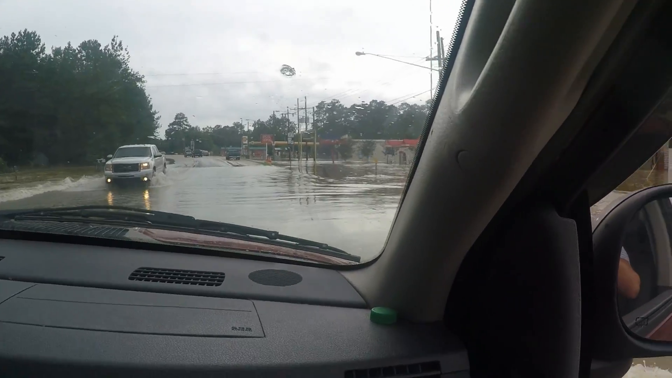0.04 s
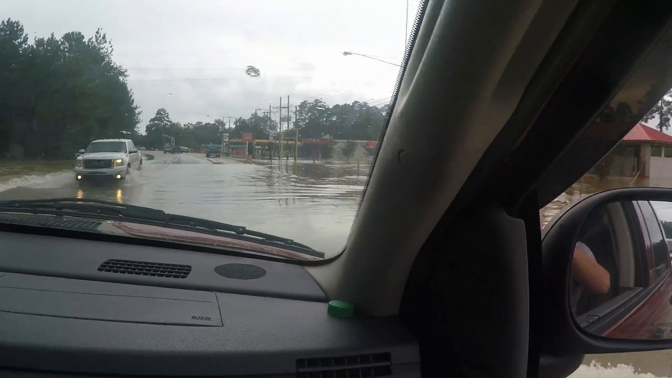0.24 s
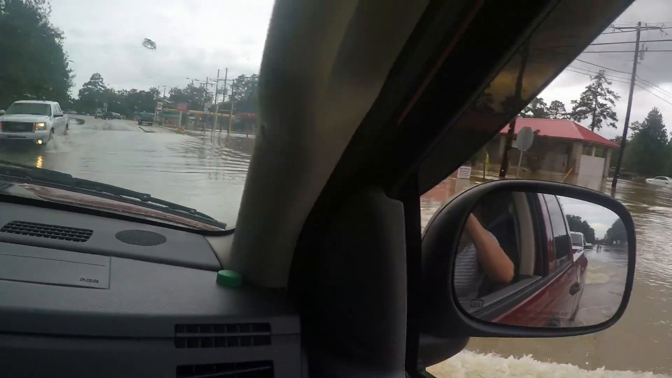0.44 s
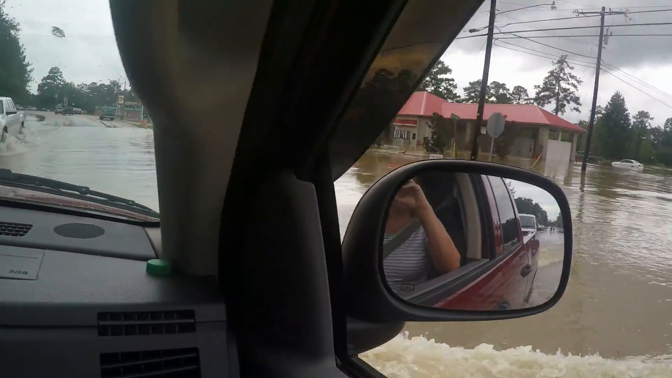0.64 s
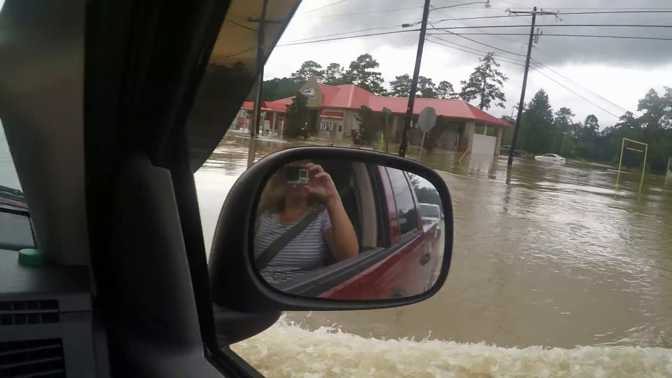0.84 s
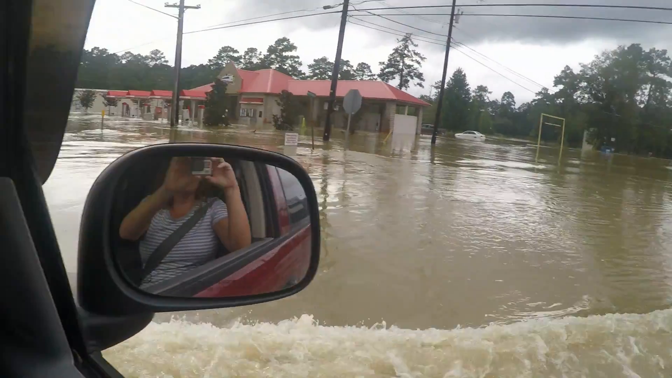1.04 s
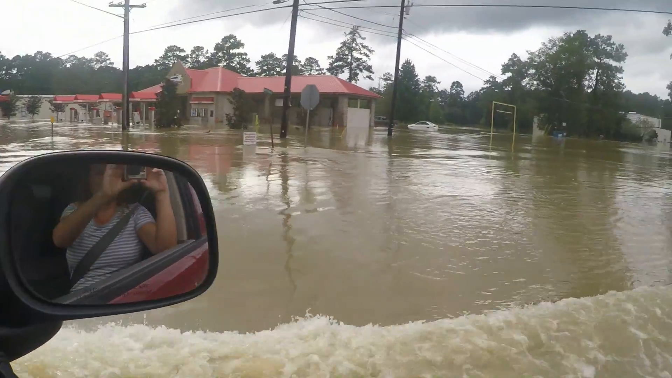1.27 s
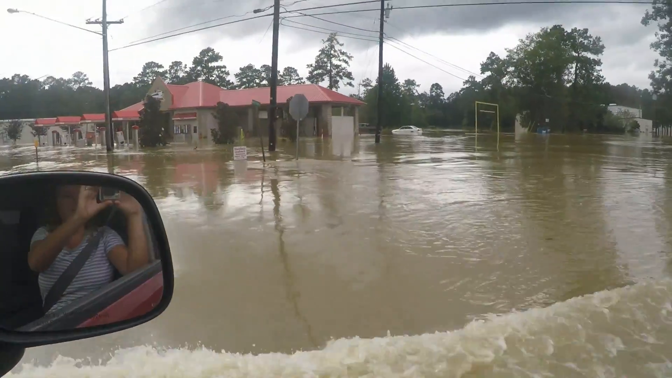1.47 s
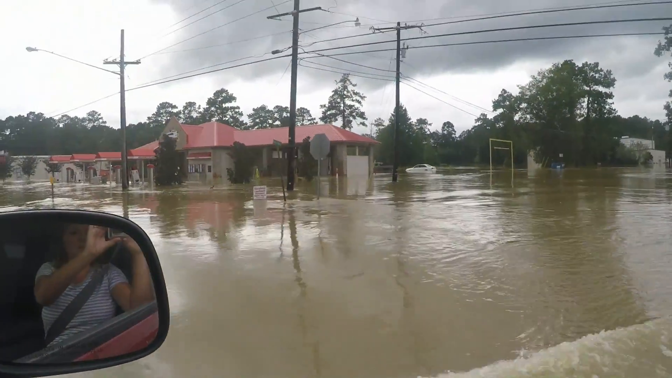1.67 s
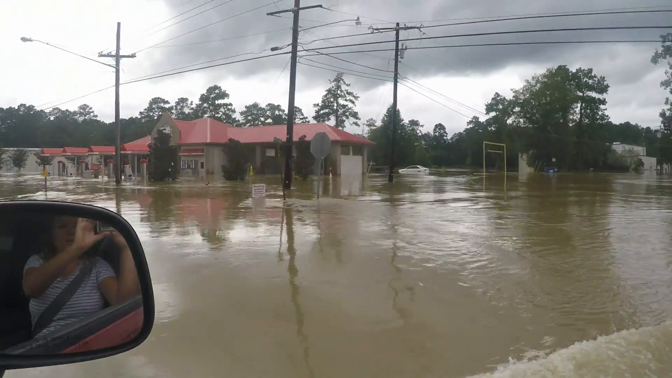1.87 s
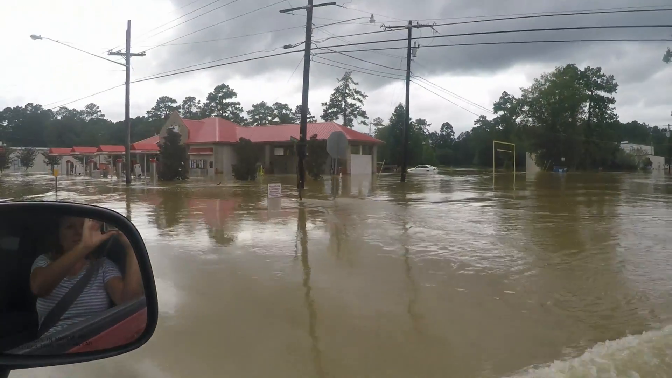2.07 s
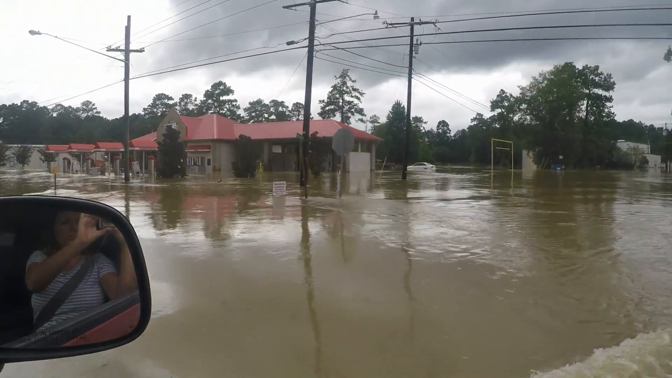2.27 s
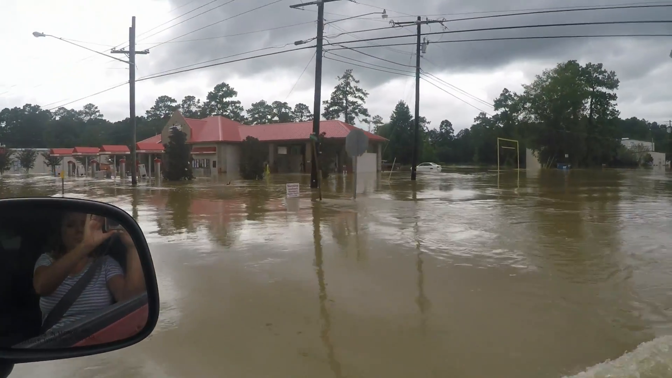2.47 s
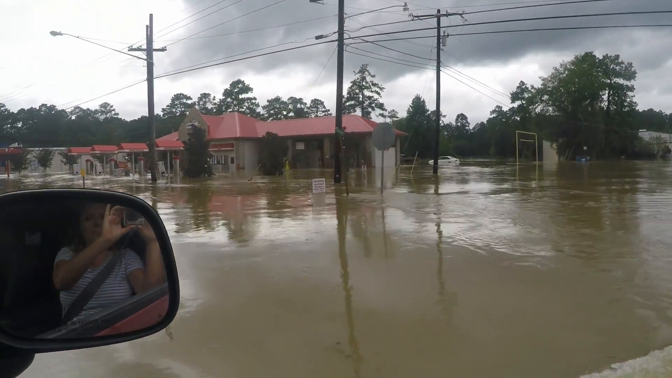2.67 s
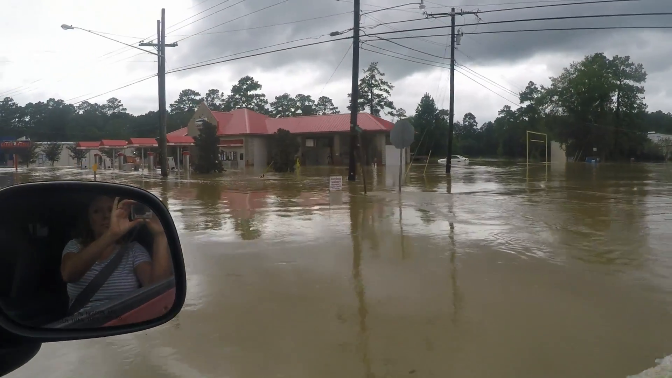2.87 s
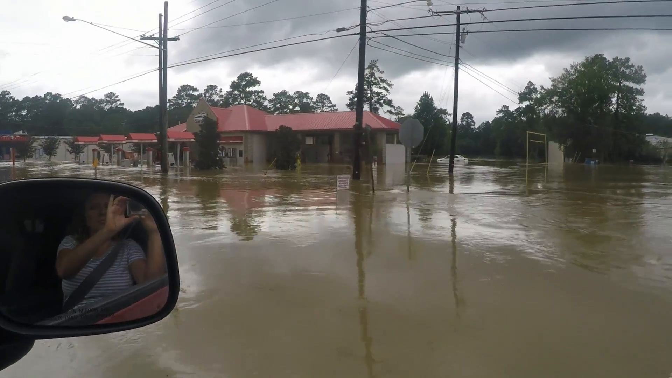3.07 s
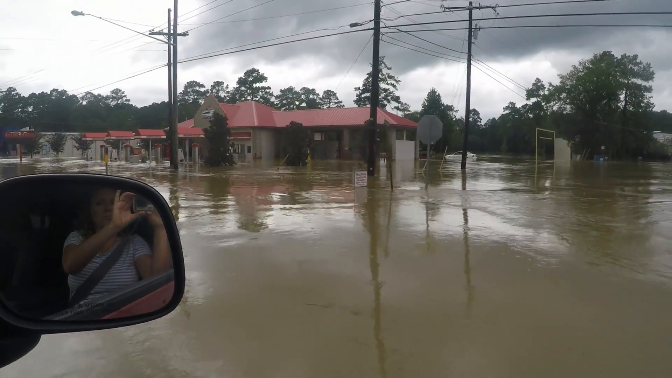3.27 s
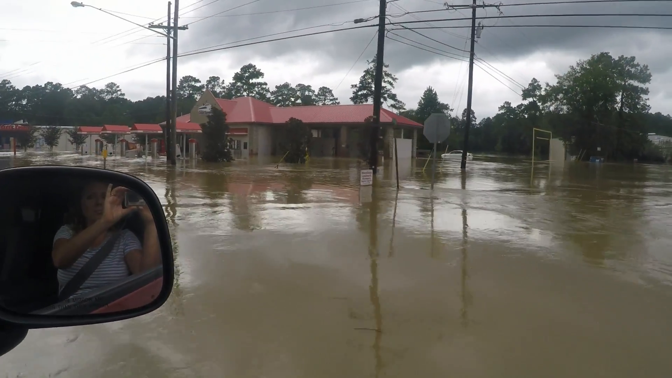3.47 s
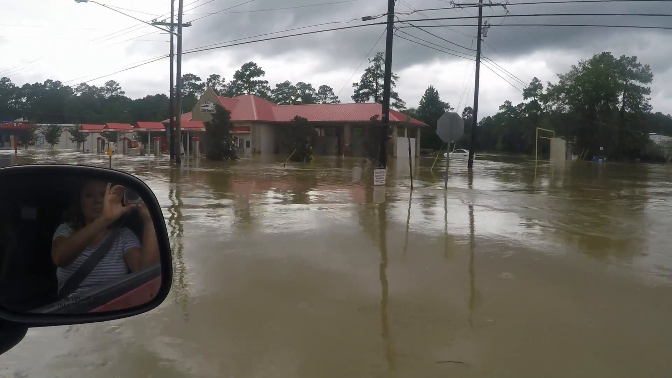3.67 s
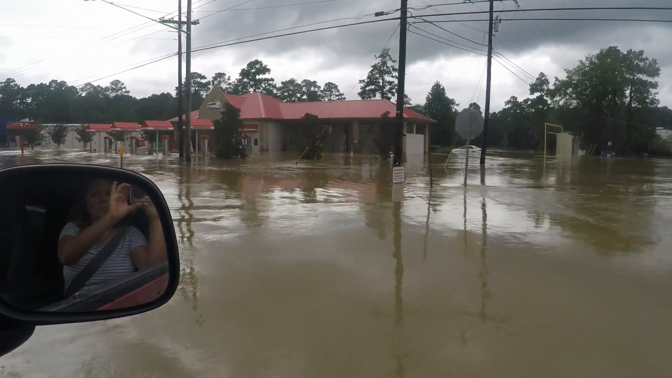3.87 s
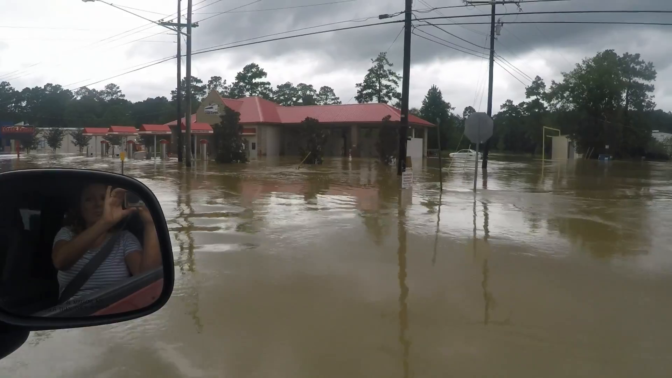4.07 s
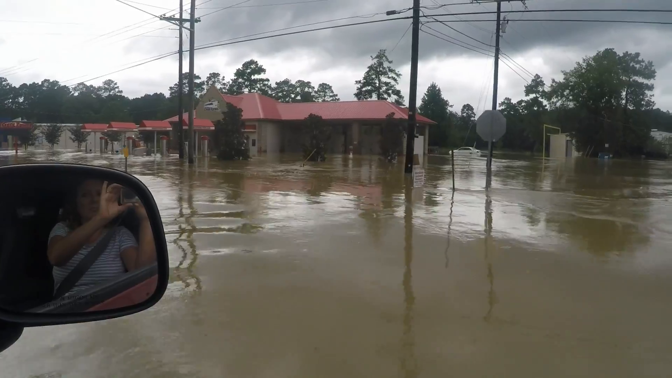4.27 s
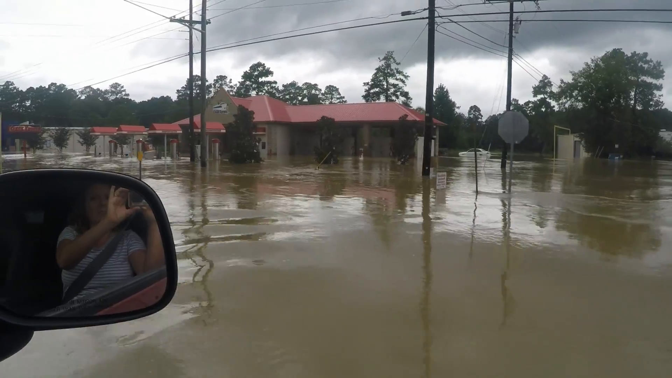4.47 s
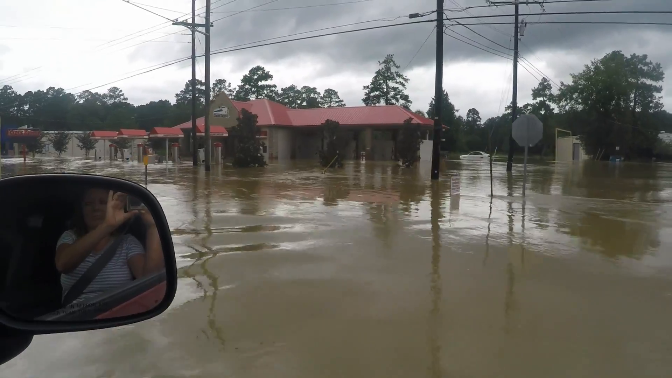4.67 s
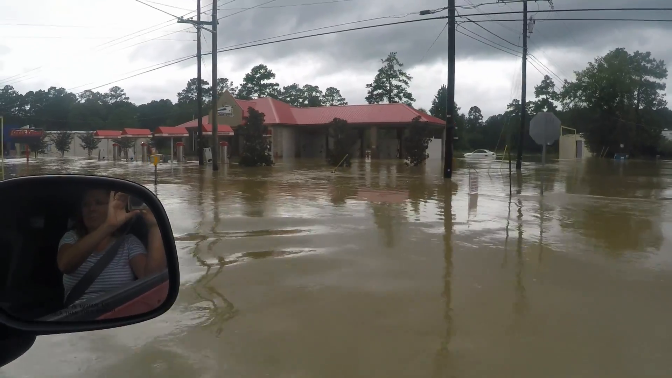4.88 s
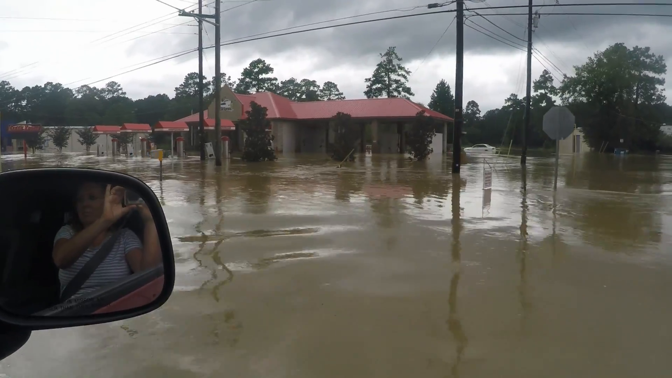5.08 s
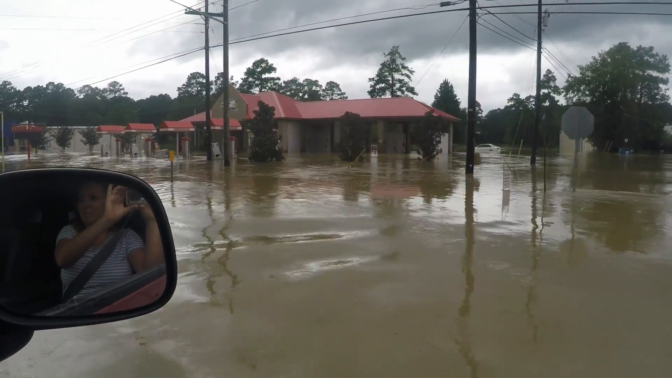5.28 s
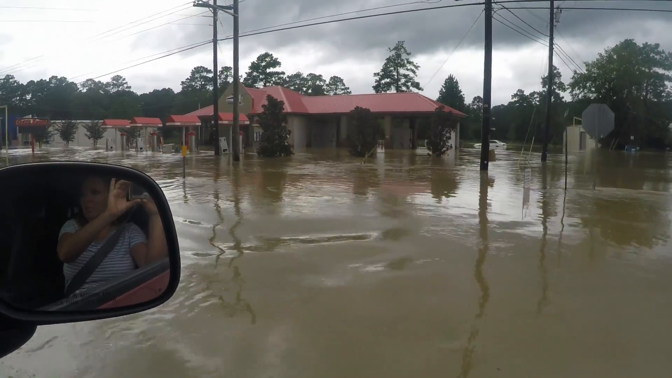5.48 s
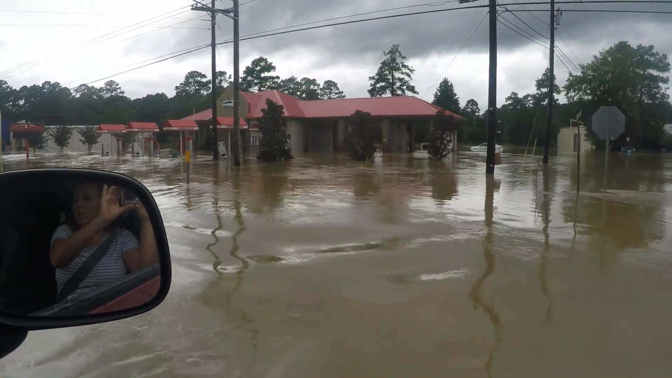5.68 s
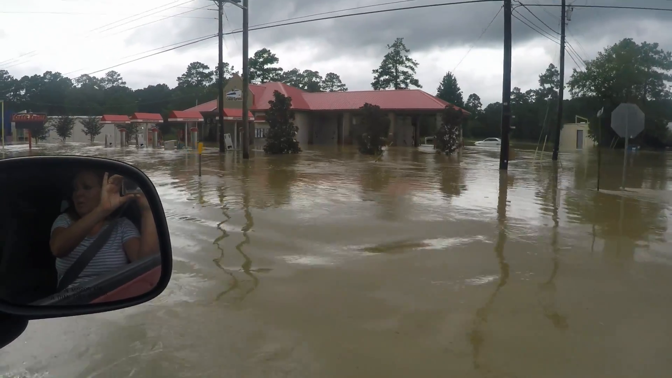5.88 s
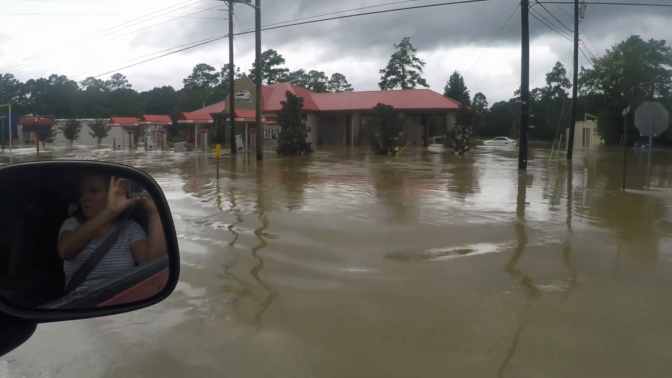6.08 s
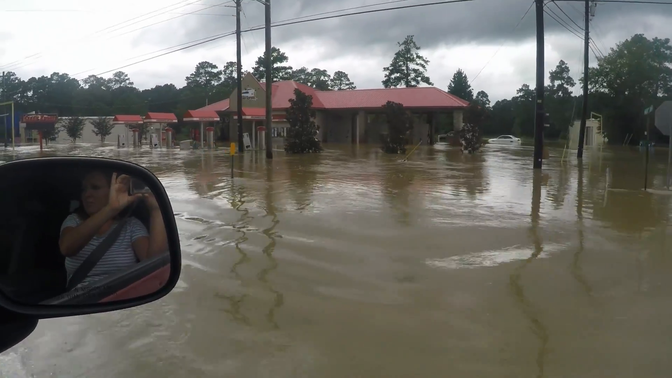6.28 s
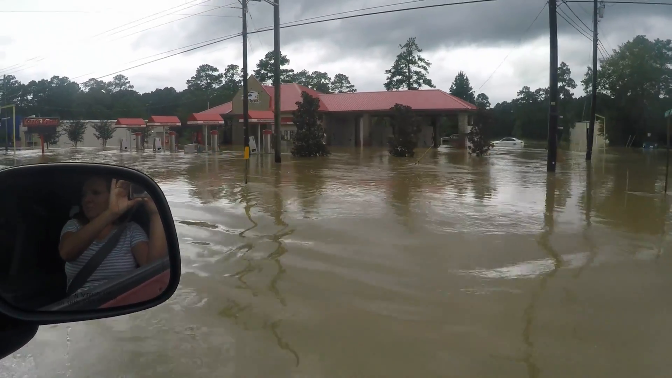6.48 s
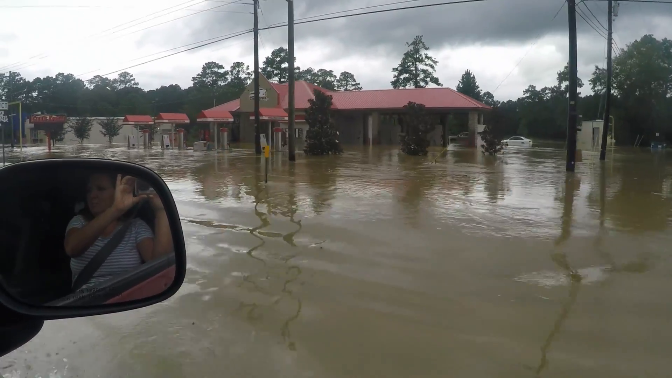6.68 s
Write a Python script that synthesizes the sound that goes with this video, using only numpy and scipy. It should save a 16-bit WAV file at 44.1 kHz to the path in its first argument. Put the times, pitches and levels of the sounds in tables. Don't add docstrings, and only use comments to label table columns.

```python
import sys
import numpy as np
from scipy import signal
from scipy.fft import rfft, irfft
from scipy.io import wavfile
from scipy.ndimage import uniform_filter1d

SR = 44100
rng = np.random.default_rng(int(sys.argv[2]) if len(sys.argv) > 2 else 0)


def put_to_file(sound):
    columns = np.atleast_2d(sound).T
    safe = np.clip(columns, -1, 1)
    whole_steps = np.round(safe * 32767)
    wavfile.write(sys.argv[1], SR, whole_steps.astype(np.int16))


def invert_db(level):
    return 10 ** (np.asarray(level, dtype=float) / 20)


N = 296686

# (time [s], rush level [dB])
WAVE_LEVEL = [(0, -41.5), (.24, -45), (.45, -46.5), (.75, -42.5), (1.0, -41), (1.2, -43), (1.5, -39),
              (2.2, -40), (3.5, -40), (5, -40), (6.73, -40)]
# (frequency [Hz], density [dB per Hz])
WAVE_SPECTRUM = [(60, -33), (150, -8.5), (400, -22), (900, -13.5), (1250, -15), (2100, -11.5), (3500, -10),
                 (4200, -15.5), (5300, -19.5), (8200, -27), (10500, -27.5), (12500, -35), (15500, -35.5)]
# (time [s], half length [s], lift [dB])
SPRAY_SLAPS = [(1.71, 0.027, -2.5), (1.972, .02, 1), (2.34, .02, 0.5), (2.592, .03, 3), (2.75, .02, 1),
               (3.056, 0.022, 2.5), (3.267, .02, 2.5), (3.4, 0.035, 2), (3.467, 0.039, 2.5), (3.69, .06, 1),
               (4.055, .03, 1.5), (4.323, 0.14, 1), (4.687, 0.034, 2.5), (4.97, 0.018, -0.5),
               (5.171, .03, 1.5), (5.295, .04, 1), (5.756, 0.036, 1), (6.0, .04, 1), (6.29, 0.025, 3),
               (6.408, 0.021, 4), (6.556, 0.028, 2.5), (6.663, 0.049, 2)]
# (frequency [Hz], width [Hz], lift [dB])
CASE_MODES = [(1392, 45.6, -14.5), (1598, 210, 7.5), (1870, 69, 3.5), (2680, 326, 9), (3000, 35, -5),
              (3760, 170, 2.5), (3900, 88, -4.5), (6010, 170, -4.5), (7260, 660, 4.5)]
# (time [s], level [dB])
RUMBLE_LEVEL = [(0, -41.5), (.35, -43.5), (.62, -34.5), (1.1, -45), (1.7, -42), (2.1, -47.5), (3.04, -47),
                (4, -48), (4.68, -50.5), (5.5, -49), (6.73, -48)]
# (frequency [Hz], density [dB per Hz])
RUMBLE_SPECTRUM = [(8.8, -41), (15, 11.5), (36, 7), (52, -1), (76, -1), (97, -7.5), (151, -13), (241, -20),
                   (400, -19.5), (520, -38), (880, -120)]
# (time [s], frequency [Hz], level [dB])
IDLE_TRACK = [(0, 64.8, -65), (1.5, 68, -70), (3, 70, -68.5), (4.2, 72.9, -69), (5.5, 74.35, -55),
              (6.73, 78, -55)]
# (time [s], frequency [Hz], level [dB])
FIRING_TRACK = [(3.6, 77.3, -64), (3.71, 82.02, -44.5), (3.83, 86.95, -57), (4.19, 111.8, -57),
                (4.63, 118.2, -53.5), (4.81, 120.5, -55), (5.52, 125.7, -52), (5.85, 129.6, -59)]
# (time [s], frequency [Hz], level [dB])
ONCOMING_TRACK = [(0, 210.5, -55), (.09, 186.3, -58.5), (.22, 203.7, -56.5), (.4, 209.6, -54.5),
                  (.7, 194, -50.5), (.95, 168.6, -58), (1.3, 163.6, -57)]
# (multiple [1], level [dB])
FIRING_ORDERS = [(1, -2), (2, -11), (3, -20.5)]
# (start [s], length [s], peak place [0-1], peak pressure [dB], brightness [dB])
STROKES = [(.005, 0.1, 0.65, -36, -16), (0.106, 0.047, 0.8, -32.5, -12), (0.164, 0.037, .9, -42.5, -15),
           (.187, 0.044, .7, -34.5, -18), (0.281, 0.14, 0.81, -33, -17.5), (0.435, 0.042, 0.2, -36.5, -20),
           (.478, 0.047, .8, -37.5, -20), (.515, 0.017, .3, -30, -14), (0.552, 0.046, .6, -43.5, -22),
           (0.586, 0.083, 0.6, -27.5, -20.5), (0.729, .142, 0.29, -24.5, -21.5), (.865, .06, 0.1, -43, -28),
           (0.976, 0.098, 0.5, -33.5, -16), (1.21, 0.041, 0.1, -37.5, -14.5), (1.248, 0.0305, .4, -43, -21),
           (1.404, .056, 0.35, -29, -25), (1.494, 0.065, 0.3, -36, -29), (1.66, 0.095, 0.52, -41.5, -22),
           (2.42, 0.065, .7, -33.5, -19), (2.486, 0.049, 0.64, -34, -18)]
# (low wall [Hz], lift [dB], free panel [Hz], lift [dB], fingertip hiss [Hz])
STROKE_GRIPS = [(1580, 0, 3140, 11, 9900), (1600, 1, 3023.2, 12, 14940), (1700, 6, 2664, 6, 9590),
                (1789, -4, 3300, 10, 13840), (1750, 2, 2400, 10.5, 15000), (1500, 15.5, 2479, 9, 5220),
                (1500, 8, 2479, 1, 5220), (1500, 5, 2770, 14, 6500), (1000, 17, 2750, -1, 4480),
                (1520, 7, 2700, 4, 4400), (1520, 11, 2730, 4.5, 4200), (1600, 8, 2600, 1, 4300),
                (1400, 14.5, 3000, 4.5, 7400), (1600, -3, 2900, 5.5, 11300), (1600, -5, 2740, 3, 9000),
                (1850, 11, 2650, 7, 4400), (1670, 8, 2726, 4, 4268), (1700, 0, 2902, -13, 9760),
                (1674, 9, 2600, 7, 5000), (1661, 13, 2650, 10, 4300)]
# (frequency [Hz], density [dB per Hz])
SKIN_SPECTRUM = [(120, -12), (250, -15.5), (550, -14), (1100, -9.5), (2200, -5), (3600, -11), (6000, -19),
                 (8500, -25.5), (12500, -27), (15500, -36)]
# (frequency [Hz], width [Hz], lift [dB])
WALL_MODES = [(846, 50, 7.5), (2950, 260, 8), (4270, 300, 9), (5350, 260, 6.5), (6930, 660, 5.5),
              (9697.4, 959.4, 7), (14610, 599, 5)]
# (start [s], length [s], level [dB], frequency [Hz])
SQUEALS = [
    (0.029, 0.019, -29.5, 3130),
    (0.052, 0.0069, -45, 3000),
    (.117, 0.028, -29, 3160),
    (0.139, 0.019, -35, 3170),
]
# (time [s], peak [dB], low mode [Hz], high mode level [dB], body level [dB])
SNAPS = [(0.1896, -33, 14000, -20, -30), (0.1896, -31, 2700, -15, -25), (0.1901, -19, 6100, -15, -30),
         (0.415, -36, 1500, 11, -15), (.518, -10.5, 900, 3, -26), (0.5184, -18, 2170, -16, -25),
         (0.5232, -19.5, 490, 2.5, -10), (0.561, -34, 1018, 3, -19), (.872, -23.5, 1220, -11.5, -12.5),
         (.878, -28, 1104, -7, -1.5), (0.892, -24, 1600, -5, -6), (1.284, -28.5, 1099, -2, -14.5),
         (1.303, -36, 897, -2, -12), (1.314, -31.5, 900, -2, -6), (1.32, -30, 902.3, -12.5, -15),
         (1.398, -12.5, 1750, -21, -28.5), (1.399, -16, 2650, -9, -34), (1.449, -18, 850, -3, -13),
         (2.408, -32, 601, -9, 1), (2.461, -21, 1087, -4, -21), (2.4688, -25, 714.8, -8, 2),
         (2.523, -28.5, 706, -2, -4), (2.567, -44, 600, -3, -1), (3.463, -26, 2620, -4, -29)]
# (time [s], peak [dB], frequency [Hz])
HAND_BUMPS = [(0.191, -29, 49.3), (0.241, -28.5, 39.7), (0.439, -31, 43.16), (0.519, -30, 43.3),
              (0.751, -31.5, 45.88), (0.869, -48, 43.04), (1.094, -36, 66.86), (1.449, -32, 71.27),
              (1.588, -26.5, 42), (1.669, -32, 106), (1.969, -41, 43.4), (2.406, -34, 59.08),
              (2.477, -30, 51.5), (2.519, -32, 46), (2.563, -33.5, 43.38), (2.675, -35.5, 42.6)]


def read(points, hz):
    f, value = np.transpose(points)
    return np.interp(np.log(hz + 1), np.log(f + 1), value)


def evened(x):
    return x / np.sqrt(np.mean(x ** 2) + 1e-20)


def curve(rows, t):
    s, *columns = np.transpose(rows)
    return [np.interp(t, s, c) for c in columns]


def add(mix, start_s, sound):
    part = mix[round(start_s * SR):][:len(sound)]
    part += sound[:len(part)]


def peaks(modes, hz):
    return sum(db / (1 + ((hz - f) / width) ** 2) for f, width, db in modes)


def resonate(x, hz, width_hz):
    turn = np.exp(2j * np.pi * np.cumsum(hz * np.ones(len(x))) / SR)
    r = np.exp(-np.pi * width_hz / SR)
    return 2 * (turn * signal.lfilter([1 - r], [1, -r], x / turn)).real


def drift(shape, size):
    once = uniform_filter1d(rng.standard_normal(shape), size, -1)
    return evened(uniform_filter1d(once, size, -1))


def shaped(x, field_db):
    hz, t, z = signal.stft(x, SR, nperseg=512, noverlap=384)
    gain = invert_db(field_db(hz[:, None], t) + 0 * t)
    gain = gain / np.sqrt(np.mean(gain ** 2, 0))
    return signal.istft(z * gain, SR, nperseg=512, noverlap=384)[1][:len(x)]


def droplets(count, per_s, spread_db):
    size = invert_db(spread_db * np.minimum(rng.exponential(1, count), 4))
    hits = rng.random(count) < per_s / SR
    return evened(size * rng.standard_normal(count) * hits)


def surge_db(t):
    return sum(db * np.exp(-((t - s) / half) ** 2) for s, half, db in SPRAY_SLAPS)


def in_case(x):
    hz = np.fft.rfftfreq(len(x), 1 / SR)
    return irfft(rfft(x) * invert_db(peaks(CASE_MODES, hz)), len(x))


def bow_wave():
    t = np.arange(N) / SR
    drops = droplets(N, per_s=2500, spread_db=2.8)
    bubble = rng.standard_normal(300) * invert_db(-60 * t[:300] / 0.0061)
    burst = signal.oaconvolve(drops, bubble)[:N]
    source = evened(rng.standard_normal(N) + 0.29 * evened(burst) + 0.5 * drops)

    def field(hz, s):
        spray_db = -1.7 + 0.31 * s + 0.35 * surge_db(s)
        octaves = np.clip(np.log2(hz / 3500 + 1e-9), 0, 1)
        patches = uniform_filter1d(drift((len(hz), len(s)), size=16), size=6, axis=0)
        return read(WAVE_SPECTRUM, hz) + spray_db * octaves + 0.6 * evened(patches)

    slosh_db = 0.24 * drift(N, size=1500) + 0.37 * drift(N, size=200)
    level_db = curve(WAVE_LEVEL, t)[0] + surge_db(t) + slosh_db
    return invert_db(level_db) * evened(in_case(shaped(source, field)))


def rumble():
    hz = np.fft.rfftfreq(N, 1 / SR)
    low = evened(irfft(rfft(rng.standard_normal(N)) * invert_db(read(RUMBLE_SPECTRUM, hz)), N))
    low = low / (0.86 + uniform_filter1d(abs(low), size=2500))
    level_db = curve(RUMBLE_LEVEL, np.arange(N) / SR)[0] + 1.0
    return invert_db(level_db) * evened(low)


def hum(rows):
    t = np.arange(N) / SR
    hz, db = curve(rows, t)
    phase = 2 * np.pi * np.cumsum(hz * (1 + 0.005249 * drift(N, size=2000))) / SR
    start_s, end_s = rows[0][0], rows[-1][0]
    on = np.clip(np.minimum(t - start_s + 0.069, end_s - t) / 0.14, 0, 1)
    orders = sum(invert_db(order_db) * np.sin(k * phase) for k, order_db in FIRING_ORDERS)
    return np.sqrt(2) * on * invert_db(db) * orders


def engine():
    hz, db = curve(IDLE_TRACK, np.arange(N) / SR)
    phase = 2 * np.pi * np.cumsum(hz * (1 + 0.0078 * drift(N, size=3000))) / SR
    idle = np.sqrt(2) * invert_db(db) * np.sin(phase)
    return idle + hum(FIRING_TRACK) + hum(ONCOMING_TRACK)


def rub(length_s, peak, pressure_db, bright_db, low_hz, low_db, panel_hz, panel_db, hiss_hz):
    t = np.arange(0, length_s, 1 / SR)
    slips = evened(rng.standard_normal(len(t)) + 0.5 * droplets(len(t), per_s=2500, spread_db=1.3))
    hiss_db = -1 + 0.85 * hiss_hz / 1000
    grip = [(low_hz, 190, low_db), (panel_hz, 220, panel_db), (hiss_hz, 0.034 * hiss_hz, hiss_db)]

    def field(hz, s):
        tilt_db = (bright_db + 18) * np.clip(np.log2(hz / 4500 + 1e-9), 0, 1)
        patches = uniform_filter1d(drift((len(hz), len(s)), size=4), size=4, axis=0)
        modes_db = peaks(WALL_MODES, hz) + peaks(grip, hz)
        return read(SKIN_SPECTRUM, hz) + modes_db + tilt_db + 1.4 * evened(patches)

    swell_db_per_s, fade_db_per_s = 128, 110
    touch_s, lift_s = 0.0064, 0.01
    late_s = t - peak * length_s
    eased_db = np.where(late_s < 0, swell_db_per_s * late_s, -fade_db_per_s * late_s)
    contact = np.clip(np.minimum(t / touch_s, (length_s - t) / lift_s), 0, 1)
    level_db = pressure_db + eased_db + 0.94 * drift(len(t), size=100)
    return invert_db(level_db) * shaped(slips, field) * contact


def squeak(length_s, db, hz):
    count = round(length_s * SR)
    tone = np.sin(2 * np.pi * np.cumsum(hz * (1 + 0.017 * drift(count, size=40))) / SR)
    scrape = evened(resonate(rng.standard_normal(count), hz, width_hz=170.4))
    return invert_db(db) * (1.5 * tone + 0.2992 * scrape) * signal.windows.tukey(count, .6)


def click(db, hz, high_db, body_db):
    t = np.arange(1500) / SR
    t60_s = 0.009
    fall = invert_db(-60 * t / t60_s) * np.minimum(t / .00005, 1)
    u = t * hz / 0.81
    low = u * np.exp((1 - u ** 2) / 2) * np.sin(2 * np.pi * hz * t)
    snap = -1.5 * (1 - t / 0.000072) * np.exp(-t / 0.00014)
    crack = 0.32 * uniform_filter1d(rng.standard_normal(len(t)), size=4)
    ring = np.minimum(t / 0.002308, 1) * 1.4 * np.sin(2 * np.pi * 3400 * t)
    high = ring + crack + snap
    body = np.sin(2 * np.pi * 300 * t) * np.exp(-t / 0.0016)
    sound = 0.62 * low + fall * invert_db(high_db) * high + invert_db(body_db) * body
    dull_hz = min(max(4400, 2 * hz), 19000)
    return invert_db(db) * signal.lfilter(*signal.butter(3, dull_hz, fs=SR), sound)


def bump(db, hz):
    swings = np.arange(round(2.5 * SR / 40)) / SR * hz
    onset = np.minimum(swings / 0.31, 1) ** 2
    return -invert_db(db + 7) * np.sin(2 * np.pi * swings) * onset * np.exp(-1.3 * swings)


def scene():
    hand = np.zeros(N)
    for (start_s, *stroke), grip in zip(STROKES, STROKE_GRIPS):
        add(hand, start_s, rub(*stroke, *grip))
    for start_s, *squeal in SQUEALS:
        add(hand, start_s, squeak(*squeal))
    for start_s, *snap in SNAPS:
        add(hand, start_s, click(*snap))
    for start_s, *push in HAND_BUMPS:
        add(hand, start_s, bump(*push))
    return (hand + bow_wave() + rumble() + engine())[None]


def low_pass(x):
    return signal.sosfilt(signal.butter(12, 15680, fs=SR, output="sos"), x)


def record(dry):
    edge_hz = 15290
    lowpass = signal.firwin(4095, edge_hz, window=("kaiser", 9), fs=SR)
    mix = signal.oaconvolve(dry, lowpass[None], "same")
    return low_pass(mix)


dry = scene()
out = record(dry)
put_to_file(out)
```